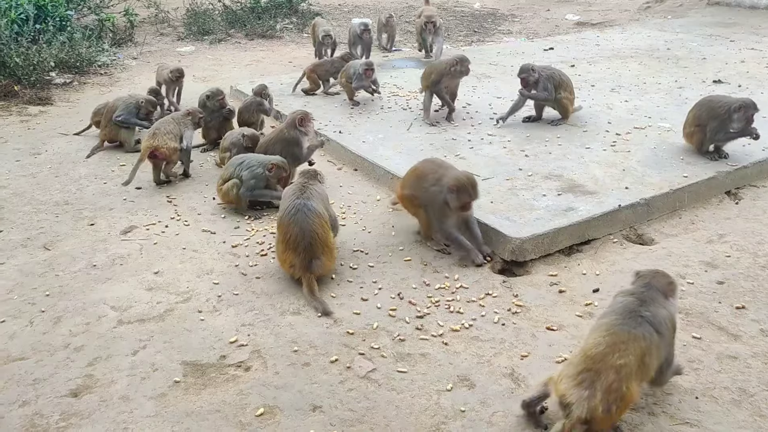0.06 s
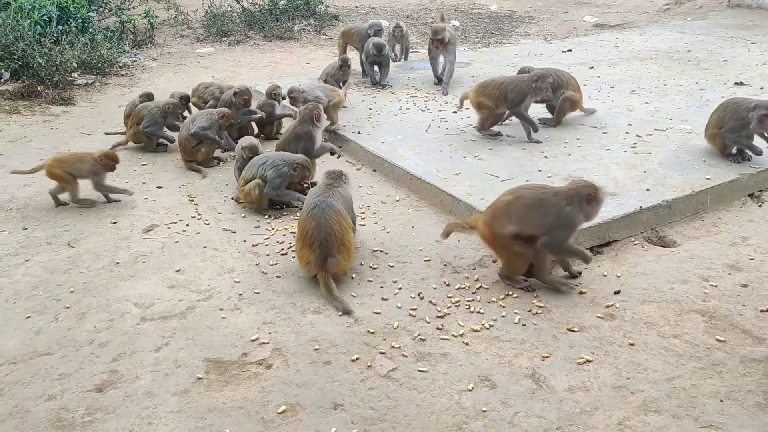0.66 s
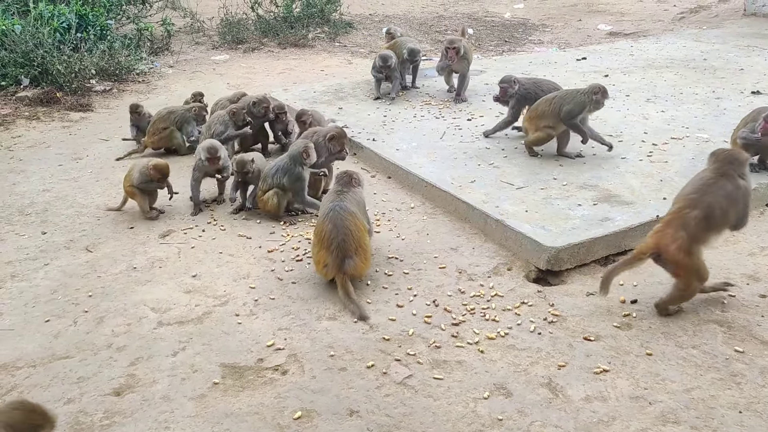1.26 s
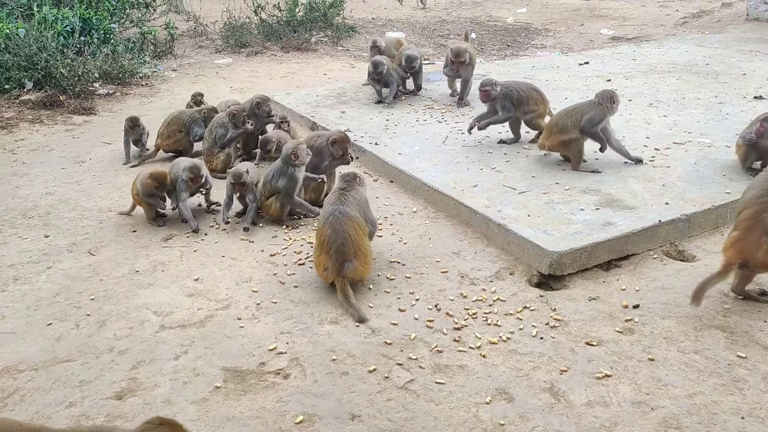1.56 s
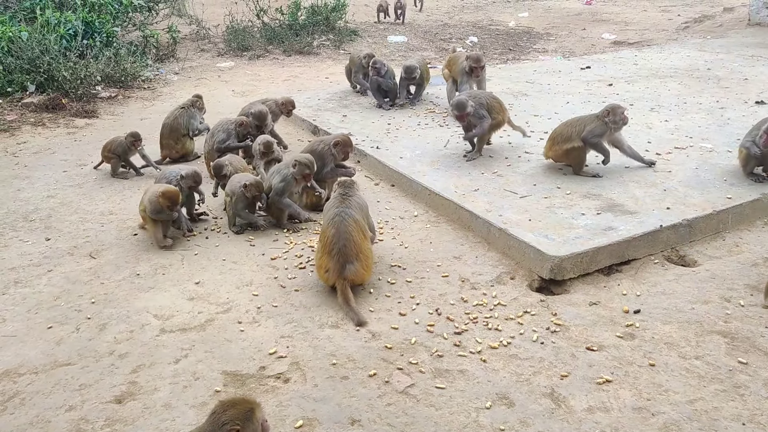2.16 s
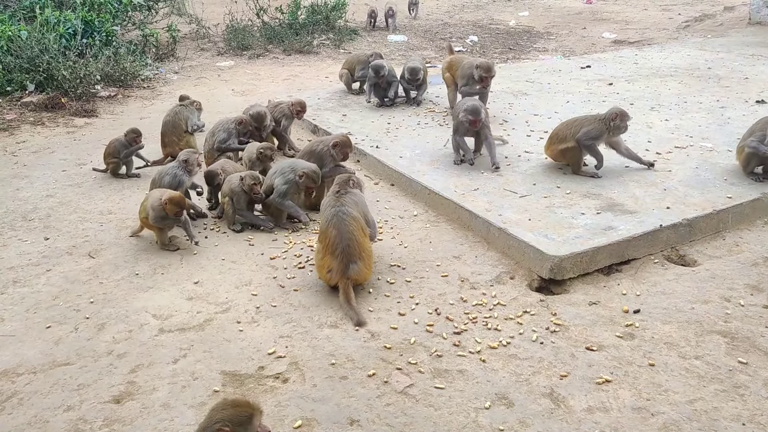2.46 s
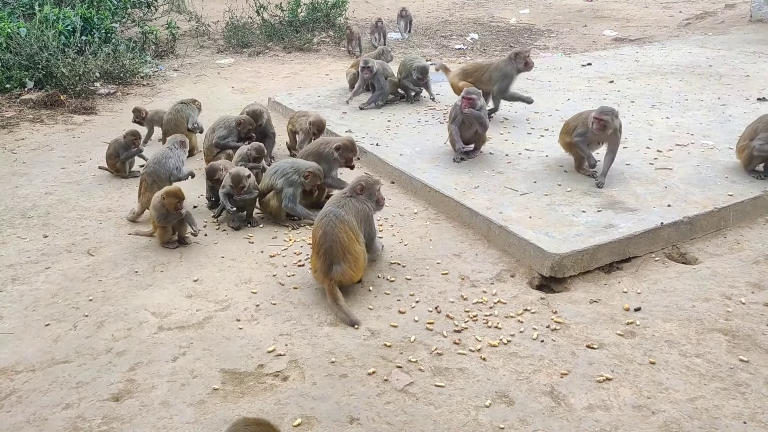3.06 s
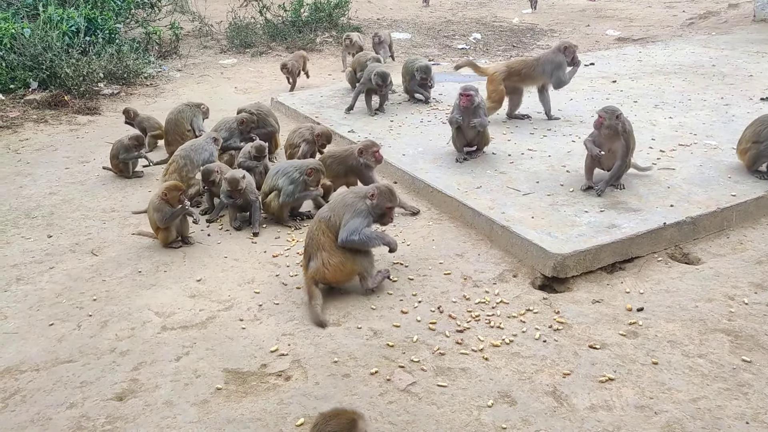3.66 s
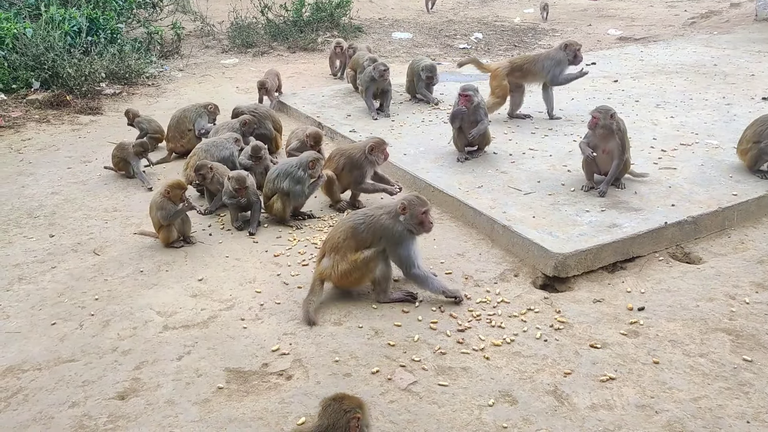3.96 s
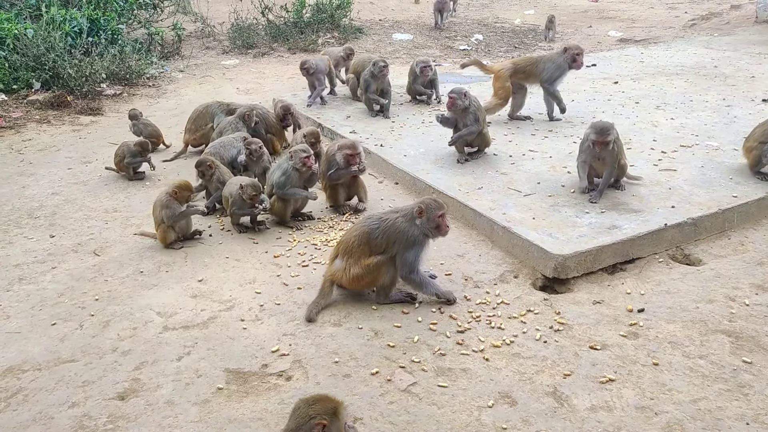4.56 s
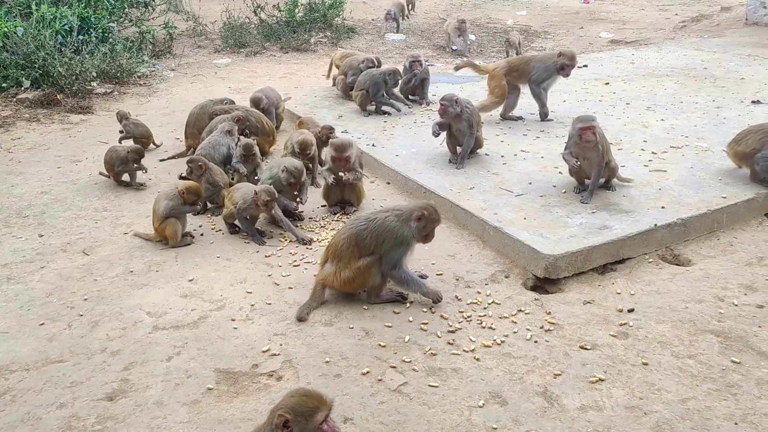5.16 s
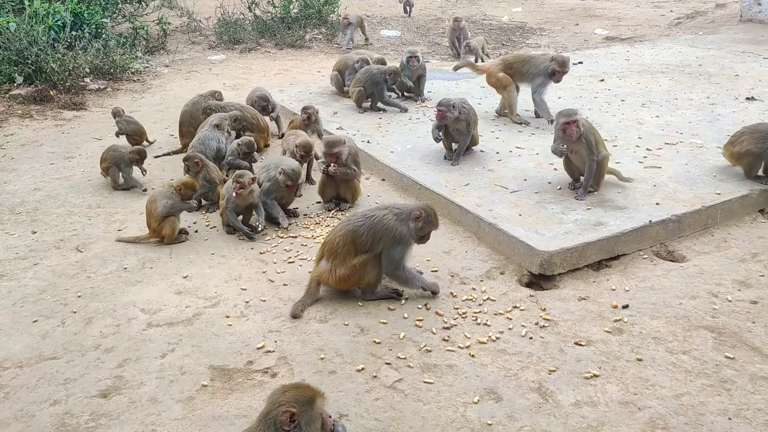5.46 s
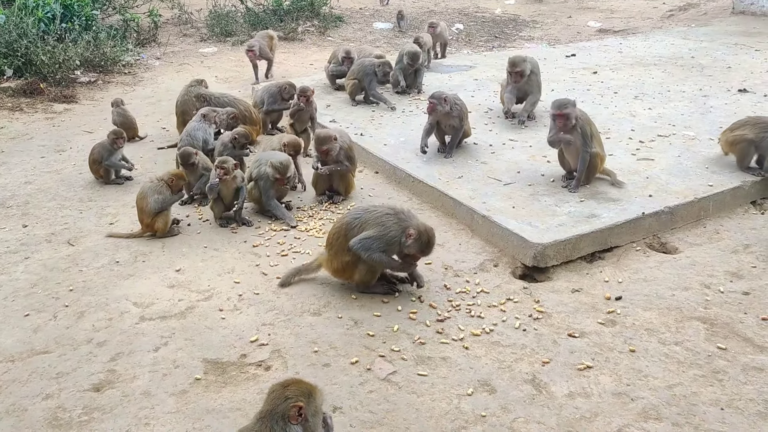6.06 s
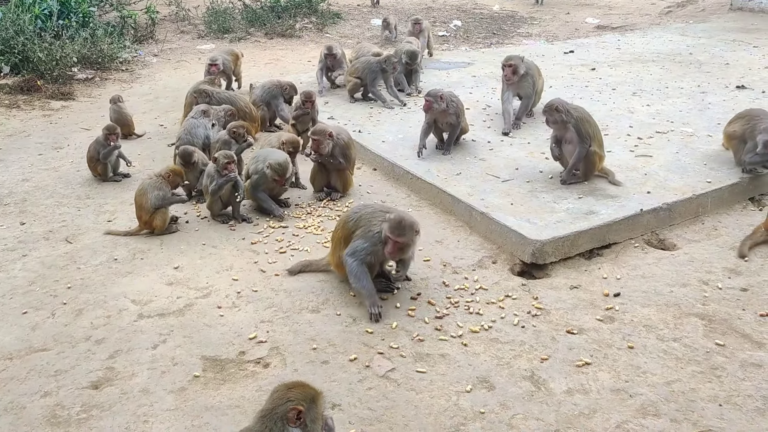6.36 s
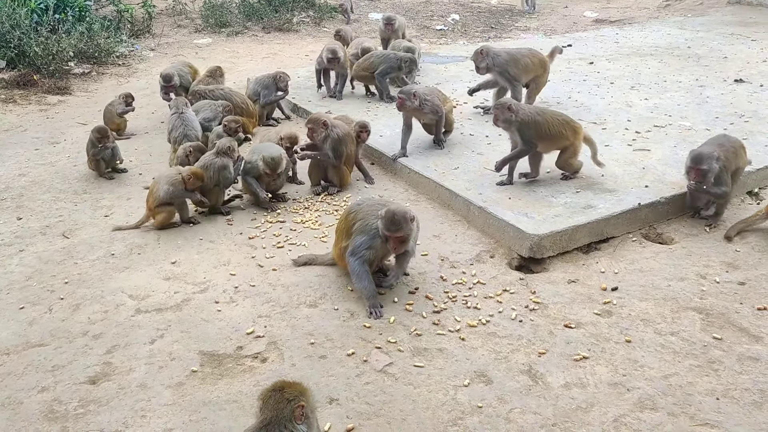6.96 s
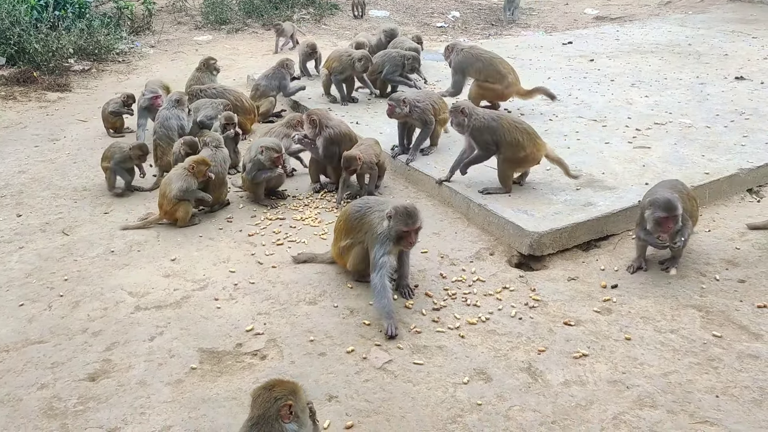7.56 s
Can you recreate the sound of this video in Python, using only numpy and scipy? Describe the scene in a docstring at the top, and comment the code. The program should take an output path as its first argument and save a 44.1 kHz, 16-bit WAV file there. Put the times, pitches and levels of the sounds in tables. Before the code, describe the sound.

Dry snaps and crunches of peanut shells run on unevenly as monkeys feed a few metres away outdoors, with paws brushing the dust and an occasional dull thud. One monkey coos on a rising pitch about a third of the way in. Later comes a cluster of high squeaks, followed by a single louder bark from the left. The yard has only a faint echo.

```python
"""Monkeys eating peanuts

A troop feeds in an open dirt yard, a few metres away. Shells snap in bursts of tiny fractures.
Husks crumble and rustle under teeth, hands and feet, which also thud on the ground.
Monkeys coo, young ones squeak and yelp, and one gives a short bark as pulses ring its throat.
The yard echoes faintly over a quiet outdoor hum."""
import sys
import numpy as np
from scipy import signal
from scipy.fft import rfft, irfft
from scipy.io import wavfile
from scipy.ndimage import uniform_filter1d

SR = 44100
rng = np.random.default_rng(int(sys.argv[2]) if len(sys.argv) > 2 else 0)


def file_out(sig):
    """Save sig as 16-bit WAV at sys.argv[1]."""
    # one column per channel
    cols = np.atleast_2d(sig).T
    # limit, then scale
    lim = np.clip(cols, -1, 1)
    pcm = np.round(lim * 32767).astype(np.int16)
    wavfile.write(sys.argv[1], SR, pcm)


N = 343980
TIME = np.arange(N) / SR

# The tone of a shell's hollow body: frequency_hz, level_db
HOLLOW_TONE = [(150, -10.5), (450, -14.5), (850, -6.5), (1500, -13.5), (2150, -1), (2800, 0), (3700, -1),
               (5000, -9), (8000, -45)]
# The tone of its crisp, splintering edge: frequency_hz, level_db
CRISP_TONE = [(2000, -31), (3500, -4), (4800, -2.5), (7900, 2), (9100, -9), (12000, -6), (15000, -5)]
# Shells snapping: start_s, level_db, ring_hz, treble_over_body_db, left_over_right_db
SHELL_SNAPS = [(0.039, -39.5, 5110, 1, -5), (0.063, -41.5, 4180, 9, -6.5), (0.149, -35, 7200, 6, -3),
               (0.19, -44.5, 6100, 2, -4), (0.427, -43.5, 4330, 3, -5.5), (0.475, -35.5, 2350, -14, -4.5),
               (0.492, -27.5, 2640, -10.5, -2), (0.586, -36, 2990, 10, -3), (0.599, -39, 6900, -1, -4.5),
               (0.636, -43.5, 3000, -30, -3.5), (1.09, -39, 7000, 14, -9.5), (1.214, -45, 6170, 12, -8.5),
               (1.234, -44.5, 4230, -4, -8.5), (1.274, -38.5, 3040, 2, -8.5), (1.302, -34, 2880, 2, -1.5),
               (1.315, -43, 5630, 9, -7), (1.373, -41, 2820, 10, -2.5), (1.491, -54, 2110, -5, -5),
               (1.55, -37, 2600, 9, -5), (1.576, -43.5, 6800, 5, -9), (1.593, -43, 3250, -3, -7),
               (1.606, -38.5, 7580, 2, -3.5), (1.675, -42, 3020, -3, -5), (1.767, -41, 3220, -1, -9.5),
               (1.873, -36.5, 3030, 7, -4), (1.941, -44.5, 2120, 11, -8), (1.964, -40.5, 2120, -15, -3.5),
               (2.048, -46, 2280, -3, -3), (2.127, -44.5, 2230, 5, -8.5), (2.151, -38, 2900, 0, -3),
               (2.197, -41, 2770, 4, -7.5), (2.205, -45, 3100, 11, -10.5), (2.258, -43, 5040, 15, 2.5),
               (2.286, -38, 2470, -4, -5.5), (2.401, -43.5, 6760, 2, -9), (2.408, -39, 3060, 10, -9),
               (2.502, -48, 3200, -15, -3), (2.557, -29.5, 5350, -2.5, 2.5), (2.567, -37, 1850, 5, 1),
               (2.63, -39.5, 7760, 12, -2.5), (2.639, -42, 6800, 0, 3.5), (2.684, -45.5, 7600, 9, -9),
               (2.774, -40.5, 7560, 4, -1.5), (2.964, -45.5, 2560, 2, 3), (3.244, -43.5, 2800, -6.5, -3),
               (3.299, -49, 2940, -5, -8), (3.331, -43.5, 2700, -2.5, -8.5), (3.385, -39, 4660, -0.5, -4),
               (3.405, -35, 2200, 1, 0), (3.413, -40.5, 3060, 16, -3.5), (3.439, -40.5, 3200, 1, 1),
               (3.54, -38, 5500, -3, 2), (3.571, -46, 7800, 6, 0), (3.66, -47, 2040, 2, -2),
               (3.894, -40.5, 2970, -11, -3), (3.916, -43, 2650, -1, -3.5), (3.929, -48, 2380, -10, 3),
               (3.968, -33, 6150, -0.5, -4), (4.023, -40.5, 5760, 8, -3.5), (4.17, -40.5, 7860, 16, -8.5),
               (4.239, -30.5, 7220, 9, -6), (4.307, -45, 3100, -1, -7), (4.363, -30, 3460, 12, -1.5),
               (4.443, -36, 3200, -0.5, 0), (4.646, -27, 2880, 3.5, -6), (4.675, -39, 2850, 1, -9),
               (4.919, -43.5, 7100, 6, -8), (4.997, -43.5, 3320, -3, -6), (5.273, -39.5, 3200, 2, 3.5),
               (5.339, -38, 2980, 8, -7.5), (5.381, -41, 2960, -3, -6), (5.397, -40, 3900, 1, -2.5),
               (5.44, -42, 7740, 3, -12), (5.494, -41, 3000, 7, -9), (5.502, -38, 7300, 7, -6.5),
               (5.591, -38, 7300, 6, -5.5), (5.64, -32.5, 7360, 3.5, -7.5), (5.676, -36.5, 3650, -8, -3.5),
               (5.789, -35, 7300, 10, -3), (5.832, -49, 2150, 0, -7), (5.848, -40.5, 3120, 2, -6.5),
               (5.934, -35.5, 6100, -3, 2.5), (5.973, -30, 6900, 0.5, -8.5), (5.987, -43, 7400, 10, 0.5),
               (6.036, -32, 2630, 14, -6), (6.05, -39.5, 5000, 4, -5.5), (6.111, -37, 4830, 23, 3),
               (6.165, -42, 5440, -1, -6.5), (6.239, -37.5, 2800, 33, -3), (6.267, -36.5, 7100, 7, -5.5),
               (6.336, -36, 7700, 6, -3.5), (6.444, -32, 7150, 1, -3), (6.468, -30.5, 4140, 3, -0.5),
               (6.532, -41, 3820, 10, -3.5), (6.781, -44.5, 3150, -2, -6), (6.943, -34.5, 3080, 12, -11),
               (6.953, -39, 3700, -4, -5.5), (6.967, -34, 7100, 25, -8), (7.068, -31.5, 3130, 0.5, 2.5),
               (7.099, -33, 3050, 6, 3), (7.148, -44, 4820, 13, 7), (7.156, -31, 6250, 10, 2.5),
               (7.166, -35, 4330, 8, 1), (7.242, -39.5, 1640, 15, -2), (7.386, -39, 7060, 5, 0),
               (7.523, -36.5, 2700, 11, 1.5), (7.565, -42, 3280, -5, 0.5), (7.719, -31.5, 2890, -8, -1),
               (7.743, -44, 2880, 3, -5.5)]


def undb(db):
    """Turn decibels into a number to multiply a sound by."""
    return 10 ** (np.asarray(db) / 20)


def unit(x):
    """Scale a sound to an average power of 1."""
    return x / np.sqrt(np.mean(x ** 2) + 1e-20)


def curves(table):
    """Join a table's points with straight lines; its first column is the time."""
    times, *columns = np.transpose(table)
    return [np.interp(TIME, times, column) for column in columns]


def waver(rate_hz):
    """A smooth random wobble of about -1 to 1; a higher rate wobbles faster."""
    window = int(SR / rate_hz)
    return unit(uniform_filter1d(uniform_filter1d(rng.standard_normal(N), window), window))


def swell(start_s, hold_s, rise_db_per_s, fall_db_per_s):
    """A loudness curve that is full by start_s, holds, then dies away."""
    gain = np.zeros(N)
    span = slice(max(int((start_s - .1) * SR), 0), int((start_s + hold_s + .25) * SR))
    age = TIME[span] - start_s
    gain[span] = undb(rise_db_per_s * np.minimum(age, 0) - fall_db_per_s * np.maximum(age - hold_s, 0))
    return gain


def add(out, start_s, sound):
    """Mix a stereo sound in at a given time."""
    start = max(int(start_s * SR), 0)
    part = sound[:, :max(N - start, 0)]
    out[:, start:start + part.shape[1]] += part


def pan(db):
    """Share a sound between left and right; above 0 dB the left is louder."""
    return unit(undb(np.array([[db], [-db]]) / 2))


def place(sound, pan_db, lag_s_per_db=.00005):
    """The further ear hears a sound softer and a moment later."""
    lag = int(abs(pan_db) * lag_s_per_db * SR)
    early, late = (0, lag), (lag, 0)
    left_pad, right_pad = (late, early) if pan_db < 0 else (early, late)
    return np.array([np.pad(unit(sound[0]), left_pad), np.pad(unit(sound[1]), right_pad)]) * pan(pan_db)


def from_left(voice, pan_db, lag_s):
    """A voice on the left reaches that ear first and louder."""
    return np.array([voice, np.roll(voice, int(lag_s * SR))]) * pan(pan_db)


def colour(x, tone, size=2048):
    """Shape a sound's bass and treble to follow (frequency_hz, level_db) points."""
    hz, db = np.transpose(tone)
    bin_hz = np.maximum(np.arange(size // 2 + 1) * SR / size, 1)
    gains = undb(np.interp(np.log(bin_hz), np.log(hz), db))
    # make the filter ring only after a sound, never before it
    cepstrum = irfft(np.log(gains))
    cepstrum[1:size // 2] *= 2
    cepstrum[size // 2 + 1:] = 0
    response = irfft(np.exp(rfft(cepstrum)))
    return signal.fftconvolve(x, response[None] / np.linalg.norm(response), axes=1)[:, :x.shape[1]]


def wide_noise(tone, apart=0.93):
    """Shaped noise that the two ears partly share."""
    noise = rng.standard_normal(N) + apart * rng.standard_normal((2, N))
    return unit(colour(noise, tone, size=8192))


def resonate(x, hz, width_hz):
    """Make a sound ring at one pitch."""
    return signal.lfilter(*signal.iirpeak(min(hz, .45 * SR), hz / width_hz, fs=SR), x)


def sweep(x, hz, width_hz):
    """Let through only a band of sound around a moving pitch."""
    turn = np.exp(2j * np.pi * np.cumsum(hz) / SR)
    lowpass = signal.butter(2, width_hz / 2, fs=SR, output="sos")
    return np.real(turn * signal.sosfilt(lowpass, x / turn))


def outdoor_hum(level_db=-63.5):
    """A faint, steady hum of low noise."""
    # The hum's tone: frequency_hz, level_db
    hum_tone = [(25, 4.5), (50, -1.5), (80, 0), (130, -9), (250, -17), (450, -18.5), (900, -16.5),
                (1500, -28.5), (3000, -25.5), (8000, -57), (15000, -45)]
    return wide_noise(hum_tone) * undb(level_db) * pan(-0.5)


def yard(x, tail_db, fade_s=0.36):
    """The ground throws back a quick, blurred echo; walls and bushes scatter a thin, duller tail."""
    echo_s, echo_spread_s, echo_db = .0105, .002, -16
    t = np.arange(SR // 2) / SR
    tail = rng.standard_normal((2, len(t))) * undb(-60 * t / fade_s) * (t > .004)
    tail = colour(tail, [(200, 0.0), (3000, -0.5), (8000, -3.0), (15000, -0.5)])
    echo = rng.standard_normal((2, len(t))) * np.exp(-abs(t - echo_s) / echo_spread_s)
    response = (undb(tail_db) * unit(tail) + undb(echo_db) * unit(echo)) / np.sqrt(len(t))
    return x + signal.fftconvolve(x, response, axes=1)[:, :N]


def shuffle(gain_db=-1, uneven_db=4.0):
    """Paws and fur brush the dust unevenly."""
    # How loud the shuffling is: time_s, level_db
    loudness = [(0, -60), (.2, -59.5), (.45, -66), (.9, -67.5), (2.5, -65.5), (4.75, -66), (5.15, -72),
                (5.4, -63.5), (6.4, -65), (6.8, -69), (7.6, -58.5), (7.8, -60)]
    # Its soft, dull tone: frequency_hz, level_db
    dust_tone = [(50, -9), (110, -9.5), (200, 2), (300, 0), (450, -8.5), (900, -9), (1800, -12.5),
                 (4000, -42)]
    db, = curves(loudness)
    return wide_noise(dust_tone) * undb(db + gain_db + uneven_db * waver(59))


def thuds():
    """Soft blows on packed earth die quickly, with little sound far below their pitch."""
    # Feet and hands landing: start_s, level_db, pitch_hz, ring_s (time to fade by 30 dB)
    landings = [(0.274, -45, 48.4, 0.047), (0.323, -46.5, 44, 0.036), (1.124, -29.5, 438, 0.0011),
                (5.029, -36.5, 585, 0.0036), (5.393, -45, 623, 0.017)]
    out = np.zeros((2, N))
    t = np.arange(SR // 4) / SR
    for start_s, db, hz, ring_s in landings:
        blow = np.sin(2 * np.pi * hz * t) * undb(-30 * t / ring_s)
        bass_cut = signal.butter(2, 0.41 * hz, "highpass", fs=SR, output="sos")
        add(out, start_s, signal.sosfilt(bass_cut, blow / blow.max()) * undb(db) * pan(0))
    return out


def thin_calls(calls, jitter, overtone_db, pan_db, flutter_db=2.5):
    """Unsteady calls: the pitch bends through three points as the loudness swells, flutters and fades."""
    out = np.zeros((2, N))
    flutter = unit(undb(flutter_db * waver(220)))
    shake = 1 + jitter * waver(350)
    for start_s, length_s, start_hz, middle_hz, end_hz, db in calls:
        progress = np.linspace(0, 1, int(length_s * SR))
        span = slice(int(start_s * SR), int(start_s * SR) + len(progress))
        hz = np.polyval(np.polyfit([0, .5, 1], [start_hz, middle_hz, end_hz], 2), progress)
        phase = 2 * np.pi * np.cumsum(hz * shake[span]) / SR
        voice = unit(np.sin(phase) + undb(overtone_db) * np.sin(2 * phase))
        envelope = flutter[span] * np.sqrt(abs(np.sin(np.pi * progress)))
        add(out, start_s, voice * envelope * undb(db) * pan(pan_db))
    return out


def far_coo():
    """A thin coo from further off on the left."""
    # The call: start_s, length_s, start_hz, middle_hz, end_hz, level_db
    calls = [(5.54, 0.373, 990, 1030, 1068, -69)]
    return thin_calls(calls, jitter=0.012, overtone_db=-24, pan_db=9)


def yelps():
    """Small yelps, made raspy by a strongly shaking pitch."""
    # Each yelp: start_s, length_s, start_hz, middle_hz, end_hz, level_db
    calls = [(.765, 0.043, 1750, 1650, 1380, -56.5), (.985, 0.025, 1290, 1345, 1410, -62)]
    return thin_calls(calls, jitter=0.12, overtone_db=-10, pan_db=-6)


def squeaks():
    """Young monkeys give short, high squeaks on the right."""
    # Each squeak: start_s, length_s, start_hz, middle_hz, end_hz, level_db
    calls = [(6.178, 0.068, 2140, 3230, 3230, -52), (6.23, 0.039, 3350, 2300, 2110, -50),
             (6.558, 0.041, 3020, 2760, 2760, -52.5), (6.612, 0.061, 2400, 3080, 3000, -47.5),
             (6.661, 0.021, 3050, 2410, 1950, -52), (6.67, 0.085, 3170, 3050, 3060, -59),
             (6.982, 0.063, 2900, 2510, 2330, -47), (7.042, 0.082, 2450, 3030, 2940, -46),
             (7.341, 0.011, 1950, 2100, 2160, -45)]
    return thin_calls(calls, jitter=0.022, overtone_db=-22, pan_db=-11)


def coo(jitter=0.0038):
    """A clear, rising voice whose overtone swells as it nears the pitch at which the mouth rings."""
    # The coo's course: time_s, pitch_hz, level_db, overtone_over_base_note_db
    course = [(2.505, 785, -72, -4), (2.55, 845, -60, 3), (2.6, 855, -59.5, 4), (2.65, 895, -59.5, 1),
              (2.71, 892, -61.5, 2), (2.75, 932, -60, 8), (2.79, 974, -52, 15), (2.87, 1009, -47.5, 13),
              (2.92, 999, -50.5, 13), (2.945, 935, -66, 9)]
    hz, db, overtone_db = curves(course)
    phase = 2 * np.pi * np.cumsum(hz * (1 + jitter * waver(82))) / SR
    overtone = undb(overtone_db)
    voice = (np.sin(phase) + overtone * np.sin(2 * phase)) / np.sqrt((1 + overtone ** 2) / 2)
    sounding = (TIME > course[0][0]) & (TIME < course[-1][0])
    return from_left(voice * undb(db) * sounding, pan_db=6, lag_s=0.00041)


def bark(jitter=.018, breath=.55):
    """Uneven pulses and rasping air ring the throat, which rings higher as the mouth opens."""
    # The bark's course: time_s, pitch_hz, level_db
    course = [(7.465, 133.5, -74), (7.495, 134.8, -42.5), (7.525, 137.5, -34), (7.55, 146.7, -31),
              (7.585, 157.5, -34), (7.612, 151.3, -31), (7.632, 145, -43.5), (7.665, 139, -48)]
    # Where the throat rings: mouth_nearly_shut_hz, mouth_open_hz, width_hz, level_db
    throat = [(500, 790, 410, -18.5), (1160, 1284, 160, 8), (1470, 1490, 126, 7)]
    hz, db = curves(course)
    cycles = np.cumsum(hz * (1 + jitter * waver(103))) / SR
    pulses = unit(np.diff(np.floor(cycles), prepend=0))
    rasp = breath * np.exp(-2 * (cycles % 1)) * rng.standard_normal(N)
    opening = undb(db - db.max())  # the louder the bark, the wider the mouth
    voice = sum(undb(gain_db) * sweep(pulses + rasp, shut_hz + (open_hz - shut_hz) * opening, width_hz)
                for shut_hz, open_hz, width_hz, gain_db in throat)
    sounding = (TIME > course[0][0]) & (TIME < course[-1][0])
    return from_left(voice / np.std(voice[sounding]) * undb(db) * sounding, pan_db=4, lag_s=0.00044)


def fractures(spread_s, ring_s, apart, count=4, size=1024):
    """A tear runs through a shell in a few shrinking jumps; apart sets how unlike the two ears are."""
    t = np.arange(size) / SR
    starts = np.r_[0, rng.exponential(spread_s, count - 1)]
    strengths = np.r_[1, rng.random(count - 1)] * np.exp(-starts / spread_s / 2)
    age = t - starts[:, None]
    jumps = (age >= 0) * strengths[:, None] * np.exp(-abs(age) / ring_s)
    envelope = np.sqrt(np.sum(jumps ** 2, axis=0))
    return envelope * (rng.standard_normal(size) + apart * rng.standard_normal((2, size)))


def husk_loudness(crumble_db=-11.5, crumble_delay_s=.005, crumble_treble_share=0.36):
    """How strong the husks' hollow and crisp parts are, from chewing, crunching and crumbling."""
    # The troop's ongoing chewing and rummaging: time_s, level_db
    chewing = [(0.0, -52.5), (0.3, -56.5), (0.9, -59), (1.4, -47), (1.83, -59), (2.5, -62.5), (3.2, -59),
               (3.75, -62.5), (4.3, -53.5), (4.9, -59), (5.5, -55), (6.3, -51.5), (6.9, -53), (7.8, -53.5)]
    # Bouts of crushing or stirring husks: start_s, hold_s, level_db, treble_over_body_db
    crunches = [(0.038, 0.023, -44, 2), (0.129, 0.035, -39, 4), (0.396, 0.24, -48.5, -1.5),
                (0.447, 0.067, -40.5, 1.5), (1.062, 0.021, -41, 4), (1.123, 0.019, -42.5, 6),
                (1.275, 0.15, -49, 7), (1.39, 0.015, -40.5, 1), (1.577, 0.071, -44.5, 3.5),
                (1.89, 0.075, -52.5, 0.5), (2.276, 0.041, -37.5, 4), (2.565, 0.058, -51.5, 2),
                (2.716, 0.16, -51.5, 3), (3.007, 0.07, -48, 1.5), (3.401, 0.064, -48, -2),
                (3.561, 0.083, -57.5, 1), (3.92, 0.11, -49, 5), (4.087, 0.0062, -41.5, 3.5),
                (4.169, 0.099, -45, 5.5), (4.227, 0.046, -44, -2.5), (4.306, 0.17, -53, 4),
                (4.438, 0.1, -54, -2), (4.65, 0.059, -39.5, 6.5), (4.762, 0.043, -41.5, 4),
                (5.032, 0.016, -43.5, 2.5), (5.326, 0.13, -45.5, 4), (5.489, 0.052, -52, 5),
                (5.657, 0.028, -38.5, 8), (5.776, 0.11, -52, 6), (5.958, 0.013, -40, 8),
                (6.029, 0.012, -41.5, 2), (6.102, 0.0047, -39, 5), (6.163, 0.035, -44, 9),
                (6.226, 0.12, -45.5, 5), (6.436, 0.046, -38, 6), (6.707, 0.029, -48.5, 3),
                (6.94, 0.059, -43.5, -0.5), (7.035, 0.074, -40, 6), (7.164, 0.017, -37, 11),
                (7.227, 0.018, -41, 1), (7.32, 0.03, -46, 3), (7.452, 0.006, -44, 9),
                (7.514, 0.097, -45, -3), (7.759, 0.05, -43.5, -2)]

    def split_power(db, treble_db):
        """Share a level's power between the hollow body and the crisp edge."""
        crisp = undb(treble_db) ** 2
        return np.array([[1], [crisp]]) / (1 + crisp) * undb(db) ** 2

    chewing_db, = curves(chewing)
    power = split_power(chewing_db, treble_db=0)
    for start_s, hold_s, db, treble_db in crunches:
        bout = swell(start_s, hold_s, rise_db_per_s=1062, fall_db_per_s=379)
        power += split_power(db, treble_db) * bout ** 2
    # every snap leaves weaker crumbling behind it
    for start_s, db, _, treble_db, _ in SHELL_SNAPS:
        crumble = swell(start_s + crumble_delay_s, 0, rise_db_per_s=1196, fall_db_per_s=392)
        power += split_power(db + crumble_db, crumble_treble_share * treble_db) * crumble ** 2
    return np.sqrt(power)


def husks(grains_per_s=190, scatter_db=3.2, grit_db=-16, lull_db=-69):
    """Tiny brittle crunches, each with its own pitch and place, over the hiss of scuffed grit."""
    grains = np.zeros((2, N))
    for when, softness, pitch, side in rng.random((int(grains_per_s * N / SR), 4)):
        grain = fractures(spread_s=0.004, ring_s=.003, apart=2.0)
        grain = grain + 2.4 * resonate(grain, 2000 * 6.5 ** pitch, width_hz=480)
        gain = undb(-scatter_db * np.log(max(softness, .03)))
        add(grains, when * N / SR, grain * gain * pan(10 * (side - .5)))
    grains = yard(grains, tail_db=-5.5)
    # even out the grains: they give the fine crackle, while the feeding sets the loudness
    grain_power = uniform_filter1d(np.mean(grains ** 2, axis=0), int(0.046 * SR))
    grains = grains / np.sqrt(grain_power + 1e-6)
    body_gain, edge_gain = husk_loudness()
    # below lull_db few husks break and mostly smooth scuffing remains
    breaking = body_gain / (body_gain + undb(lull_db))
    scuffing = np.sqrt(1 - breaking ** 2 + undb(grit_db) ** 2) * rng.standard_normal((2, N))
    rustle = breaking * grains + scuffing
    body = unit(colour(rustle, HOLLOW_TONE)) * body_gain * pan(-1.0)
    edge = unit(colour(rustle, CRISP_TONE)) * edge_gain * pan(-5.0)
    return body + edge


def shell_snaps(gain_db=0.78, ring_db=-4, snap_s=.006):
    """Each snap has a hollow body, a crisp edge and brief rings set by the piece's size and shape."""
    out = np.zeros((2, N))
    for start_s, db, ring_hz, treble_db, pan_db in SHELL_SNAPS:
        tear = fractures(spread_s=.0017, ring_s=.0011, apart=1.0)
        # so small a shell gives off little bass, and a light snap least of all
        lowest_hz = 1050 * undb(-(db + 31) / 3)
        bass_cut = signal.butter(1, lowest_hz, "highpass", fs=SR)
        body = unit(signal.lfilter(*bass_cut, colour(tear, HOLLOW_TONE, size=512)))
        edge = unit(colour(tear, CRISP_TONE, size=512))
        # one main ring and two weaker, higher ones that vary from shell to shell
        rings = [(ring_hz, 1)] + [(ring_hz * 2 ** octaves, .5) for octaves in rng.random(2)]
        ring = unit(sum(gain * unit(resonate(resonate(tear, hz, 380), hz, 900)) for hz, gain in rings))
        ring = np.roll(ring, int(.0004 * SR), axis=1)  # the piece rings just after the break
        snap = place(unit(body + undb(treble_db) * edge) + undb(ring_db) * ring, pan_db)
        snap *= np.sqrt(snap_s * SR / snap.shape[1])  # as much energy as a steady sound lasting snap_s
        add(out, start_s, snap * undb(db + gain_db))
    return out


def scene():
    """Feeding noises and calls in the open yard; young and distant voices echo more than near ones."""
    feeding = yard(shell_snaps() + thuds(), tail_db=-10.5)
    far_voices = yard(squeaks() + yelps() + far_coo(), tail_db=-8.5)
    near_voices = yard(coo() + bark(), tail_db=-19)
    return feeding + husks() + shuffle() + far_voices + near_voices + outdoor_hum()


def record(dry):
    """Cut away the very highest treble."""
    top_hz = 15800
    return signal.sosfilt(signal.ellip(10, .2, 75, top_hz, fs=SR, output="sos"), dry)


dry = scene()
out = record(dry)
file_out(out)
```